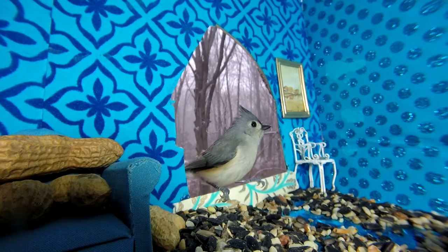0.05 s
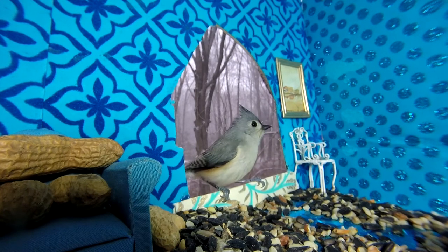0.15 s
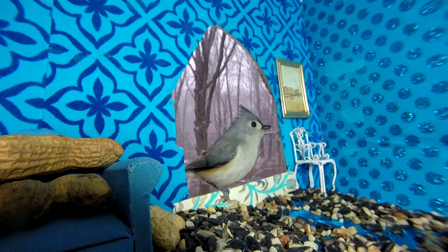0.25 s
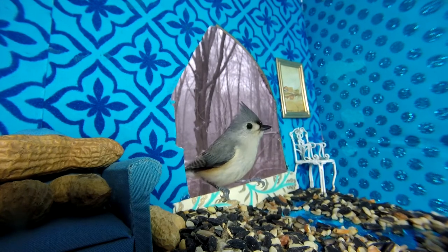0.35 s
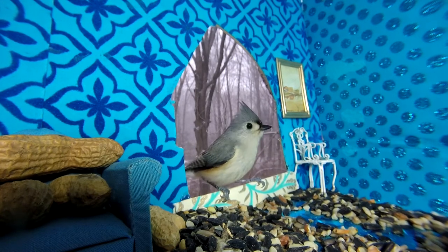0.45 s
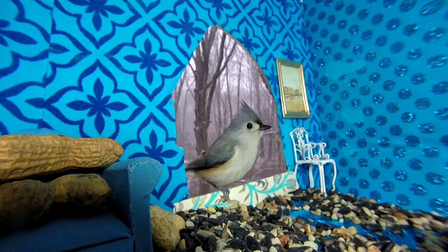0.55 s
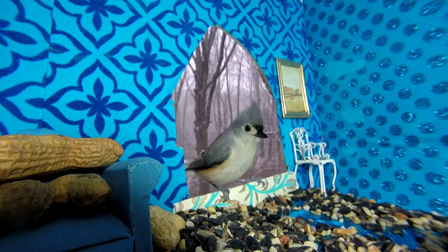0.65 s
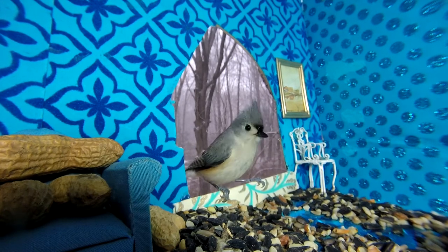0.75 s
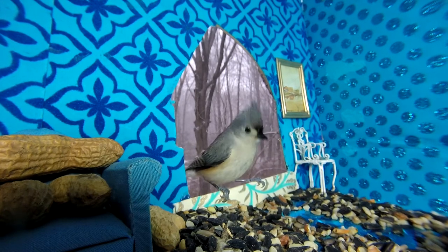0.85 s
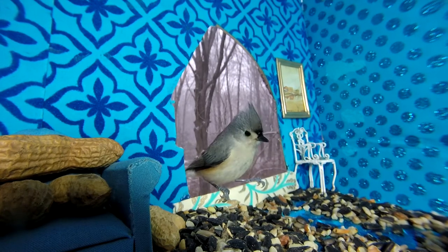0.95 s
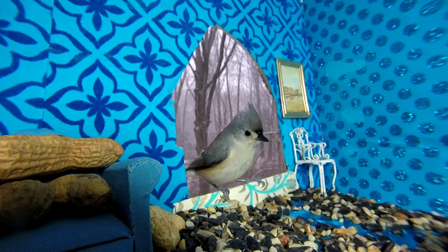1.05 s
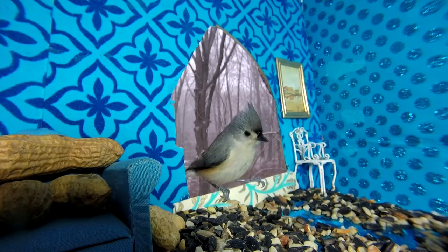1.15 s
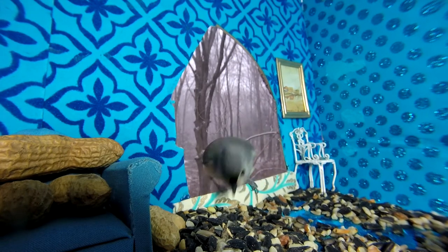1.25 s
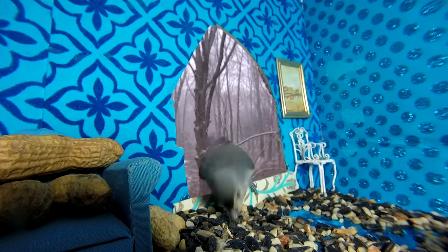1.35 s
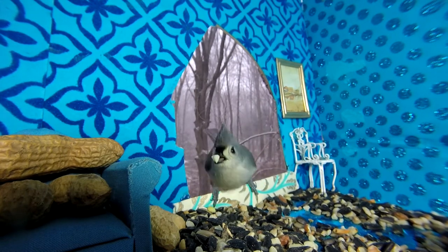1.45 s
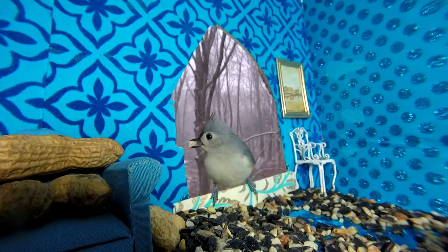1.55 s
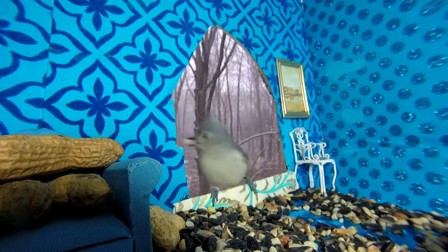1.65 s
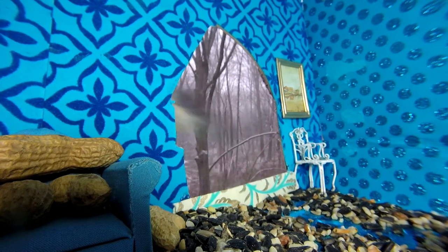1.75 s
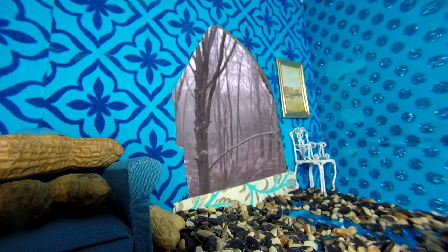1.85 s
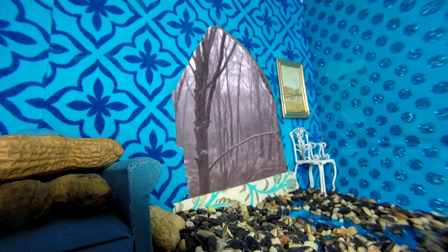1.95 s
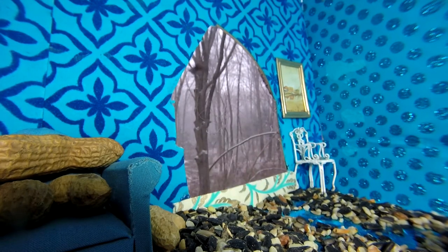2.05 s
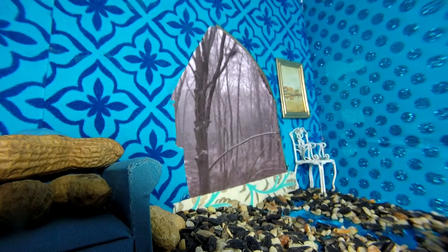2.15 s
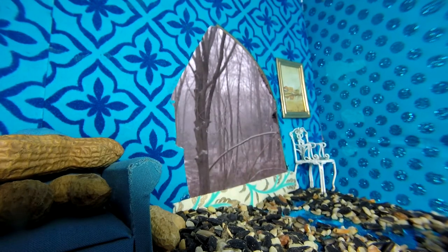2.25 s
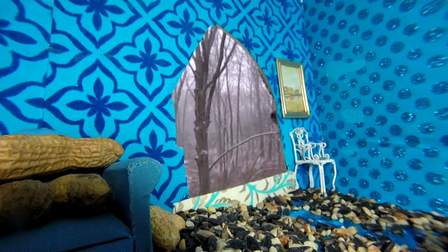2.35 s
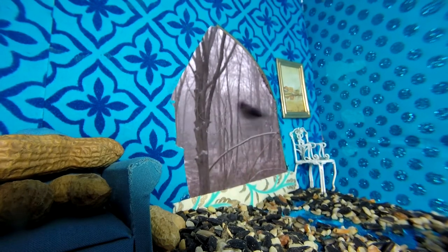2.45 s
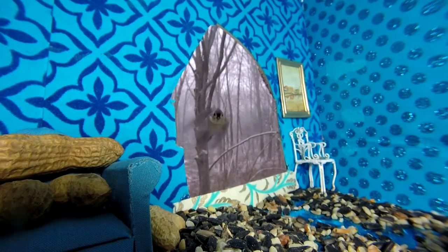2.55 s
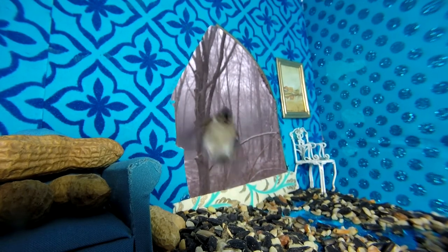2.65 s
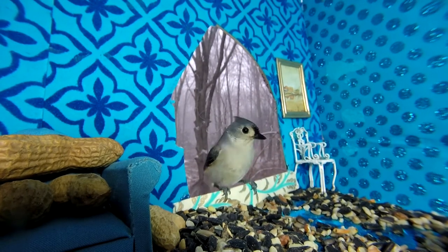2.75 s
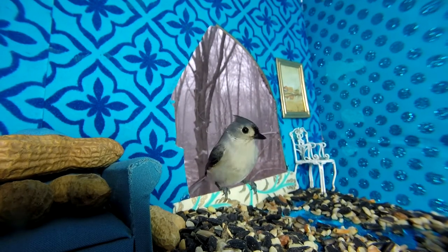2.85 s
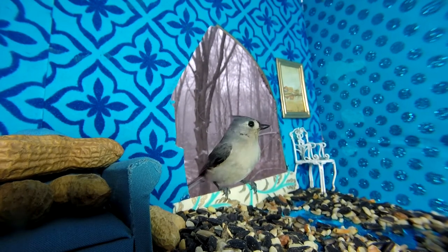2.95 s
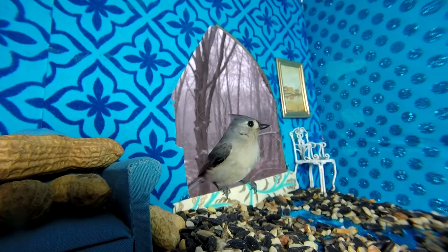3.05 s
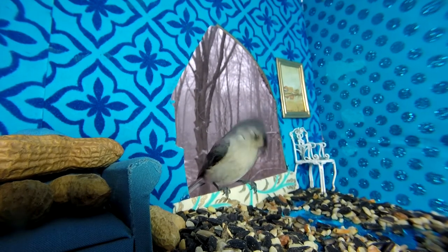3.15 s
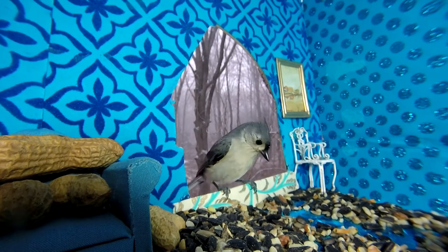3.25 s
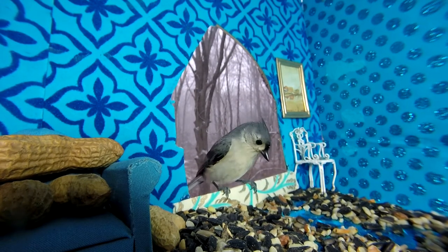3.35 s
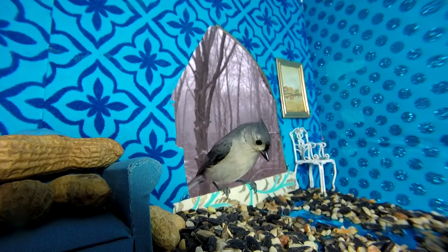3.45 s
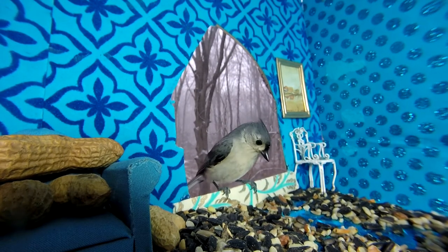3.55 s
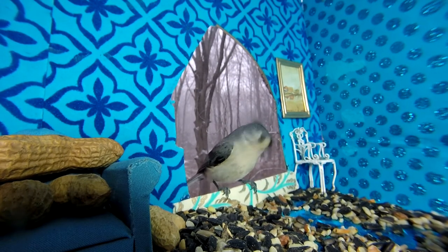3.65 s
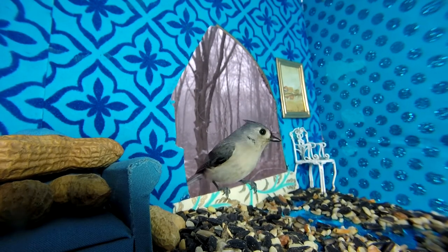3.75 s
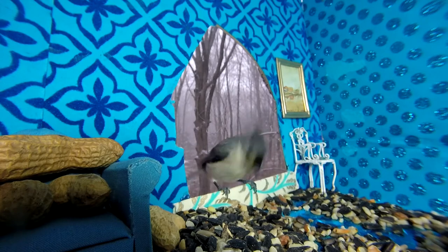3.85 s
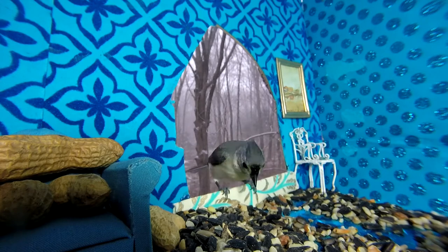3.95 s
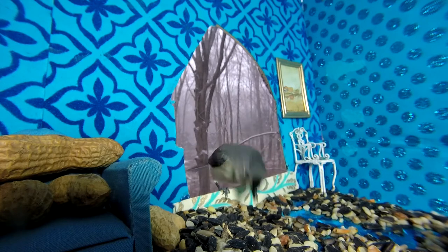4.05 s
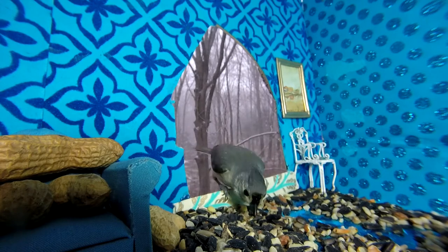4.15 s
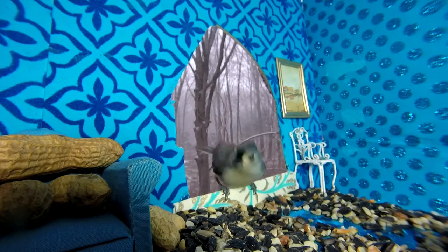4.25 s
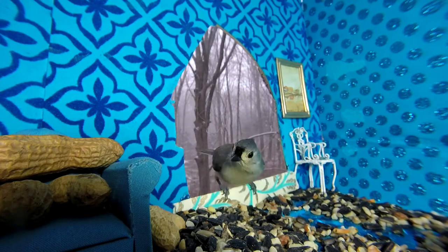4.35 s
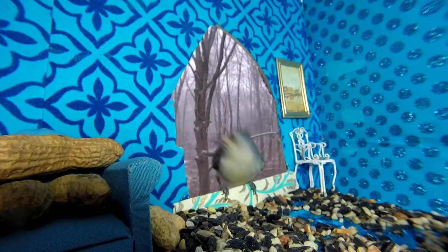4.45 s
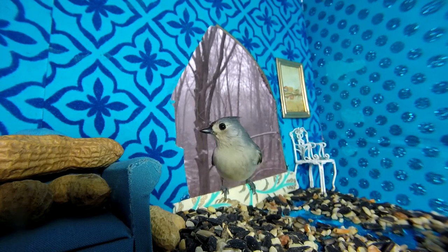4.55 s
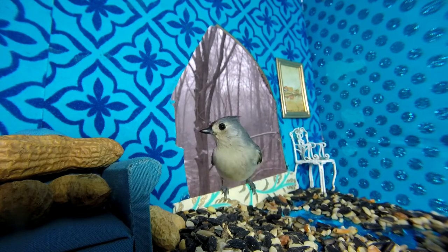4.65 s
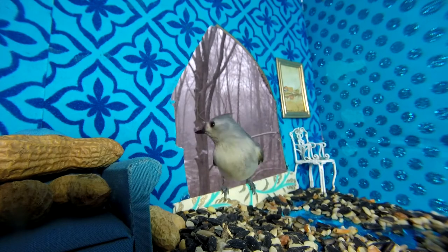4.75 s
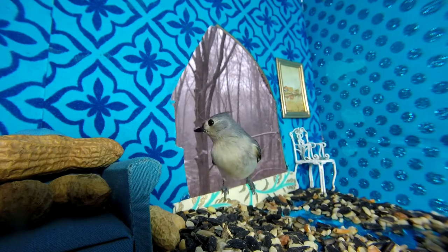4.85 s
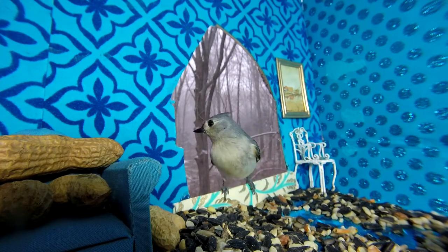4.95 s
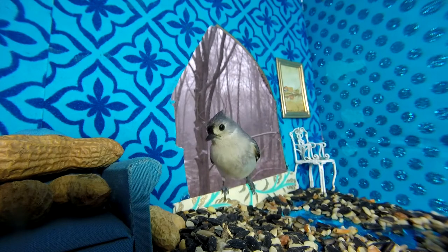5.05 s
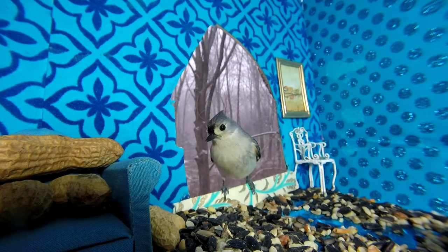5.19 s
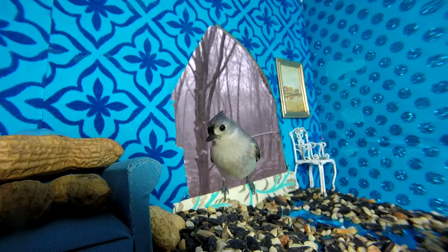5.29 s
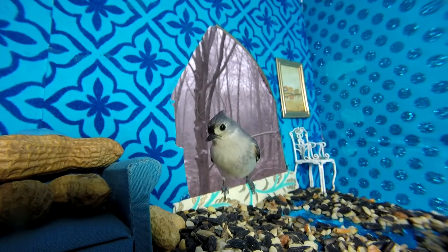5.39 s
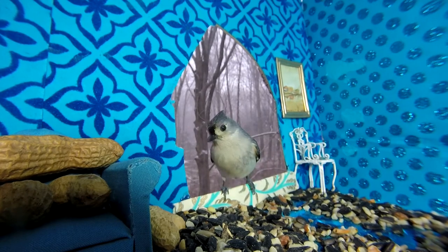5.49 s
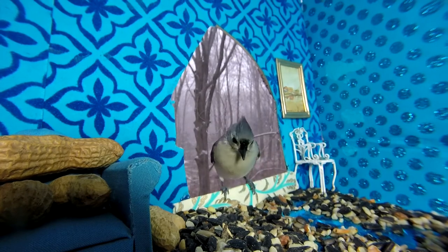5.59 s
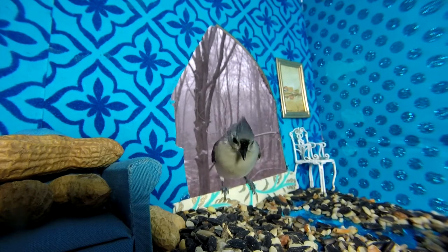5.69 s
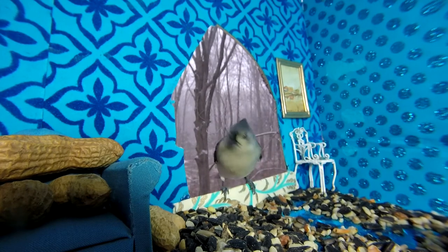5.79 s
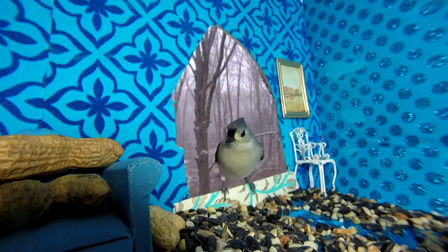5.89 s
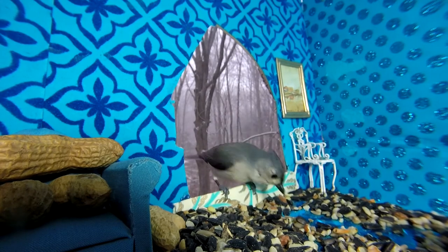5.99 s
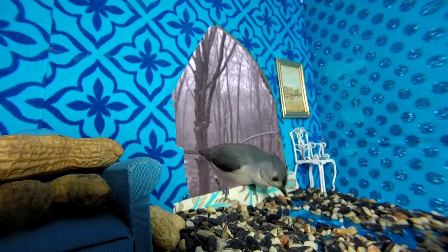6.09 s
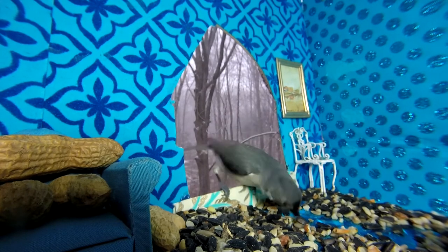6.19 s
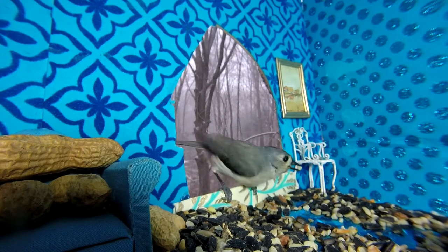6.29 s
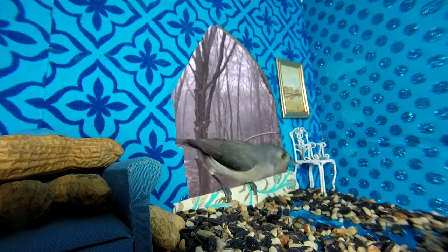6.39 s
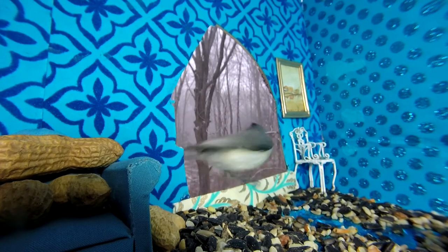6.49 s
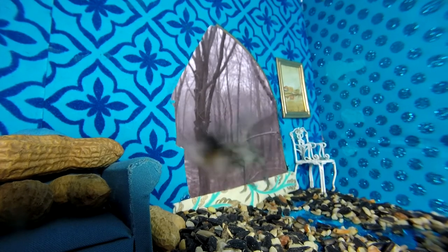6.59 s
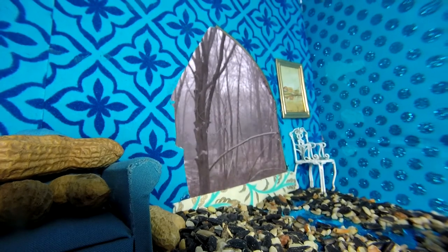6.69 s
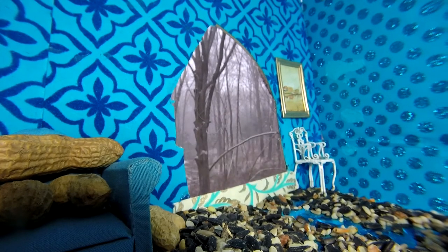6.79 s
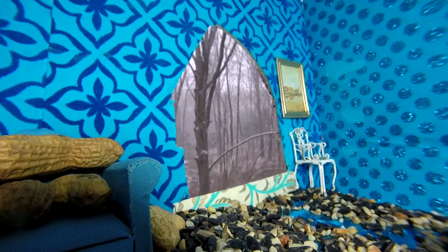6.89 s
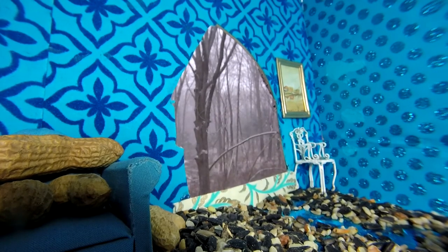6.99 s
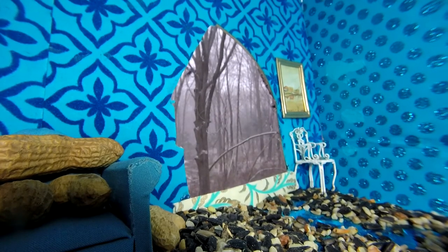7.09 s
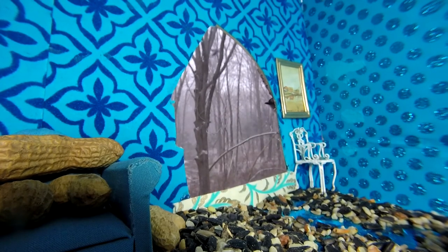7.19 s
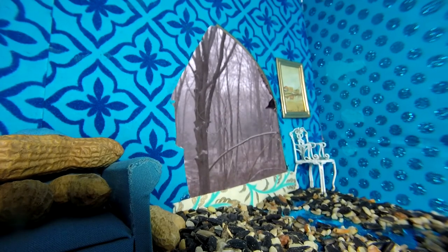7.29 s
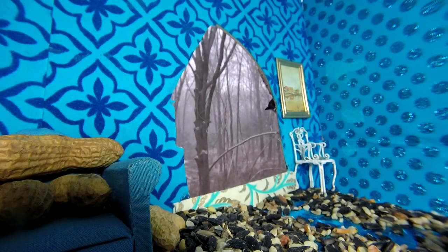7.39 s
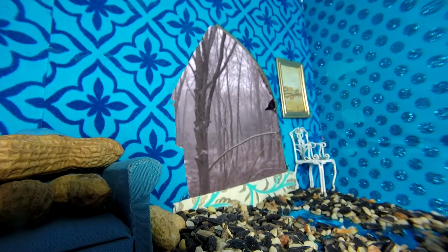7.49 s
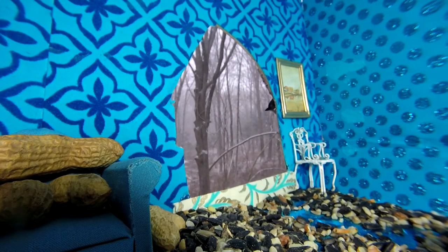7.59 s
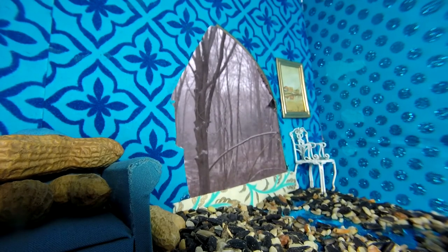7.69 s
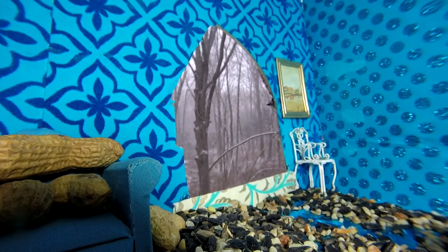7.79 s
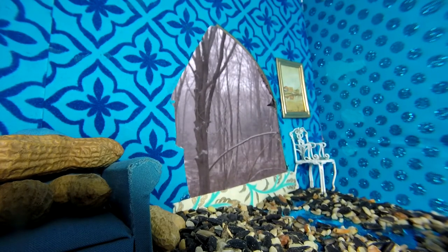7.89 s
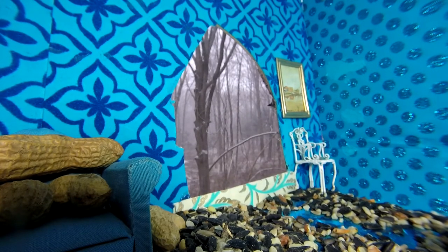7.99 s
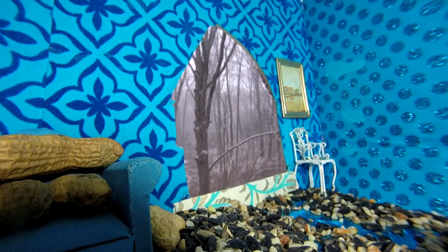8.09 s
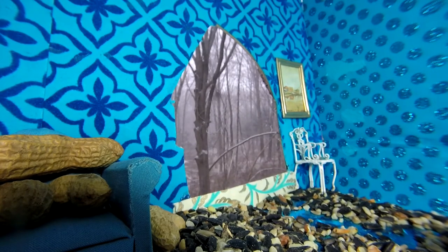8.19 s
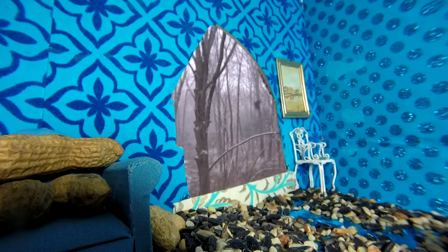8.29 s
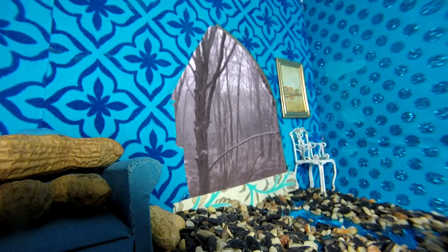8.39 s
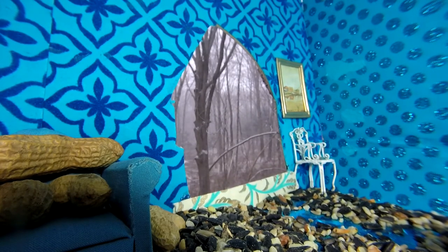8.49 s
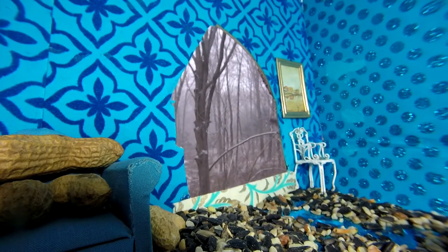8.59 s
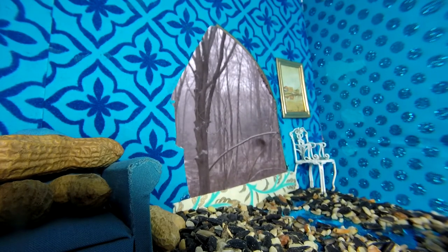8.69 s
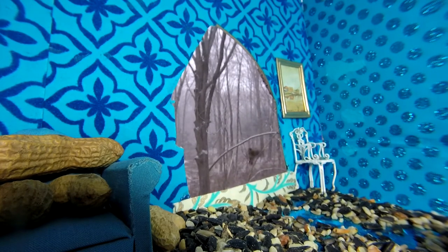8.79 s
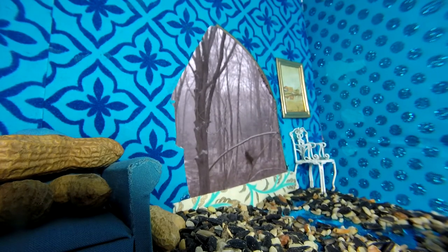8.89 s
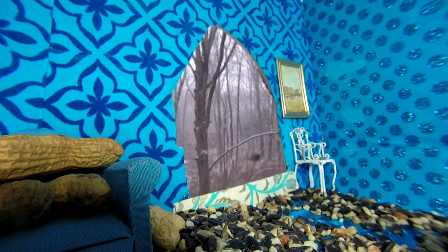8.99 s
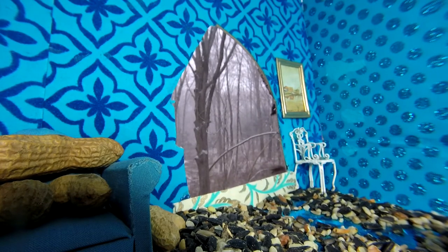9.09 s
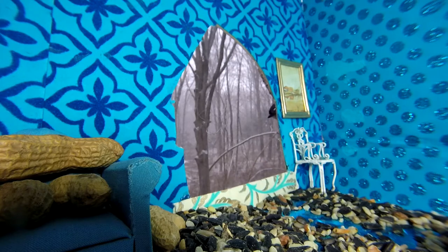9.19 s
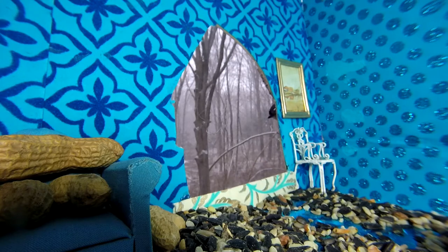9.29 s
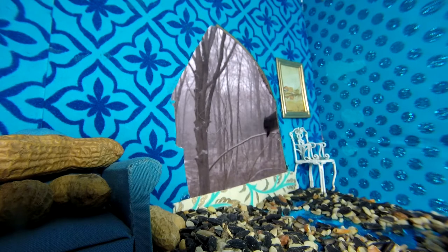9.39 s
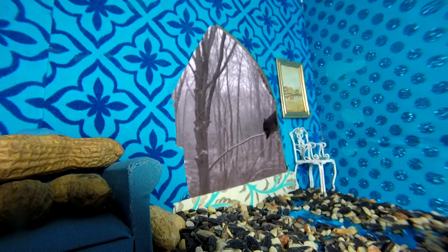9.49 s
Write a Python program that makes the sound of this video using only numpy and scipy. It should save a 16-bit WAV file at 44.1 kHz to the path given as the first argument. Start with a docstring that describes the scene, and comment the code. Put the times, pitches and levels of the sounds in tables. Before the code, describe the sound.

A soft outdoor rumble and a low, steady-pitched but wavering distant motor hum continue throughout, the hum swelling and fading. The first second is nearly quiet, with faint hollow taps. At 1.2-1.7 s small claws scrabble and knock sharply on resonant wood, then about nine rapid low wing snaps with puffs of air fade by 2.2 s. Light knocks precede a fluttering return around 2.5 s and a strong woody landing at 2.7 s. Tiny clicks and sparse touches follow through 5 s; firmer pecks come near 5.3 s. Knocks at 6.2 s lead to dense scratching and a loud take-off flutter at 6.5-7 s. Small taps continue near 7.1 and 8.25 s, then a weak flutter and light knocks at 9.1-9.3 s. Thin, distant gliding whistles echo briefly near 2.5, 5.6 and 8.7 s. The microphone sits inside the hollow box, very close.

```python
"""A wavering hum and outdoor rumble come first; then a small bird hops, scrabbles and pecks on a wooden feeder box.
It flies off and comes back, heard by a microphone inside the hollow box.
Feet, claws and beak are short rough bursts of noise and fading tones, the box's own notes.
Wing beats are short low snaps and slow puffs of air, with gusts of filtered noise around them.
A far bird's thin gliding whistles echo behind; the hum is a slowly wandering tone, the rumble shaped noise."""
import sys
import numpy as np
from scipy import signal
from scipy.fft import rfft, irfft
from scipy.io import wavfile
from scipy.ndimage import uniform_filter1d

SR = 44100
rng = np.random.default_rng(int(sys.argv[2]) if len(sys.argv) > 2 else 0)


def bounce(signal):
    """Save signal as a 16-bit WAV file at the path given by the first command-line argument."""
    frames = np.transpose(np.atleast_2d(signal))
    limited = np.clip(frames, -1, 1)
    pcm = np.round(limited * 32767).astype(np.int16)
    wavfile.write(sys.argv[1], SR, pcm)


N = 420713
T = np.arange(N) / SR  # time of each sample [s]

# colour of the outdoor air noise: (frequency [Hz], relative level per Hz [dB])
AIR_COLOUR = [(15, -28), (22, -2), (70, 3.5), (170, -5), (277, -7), (642, -13), (738, -18), (1190, -26),
              (1610, -26.5), (8650, -40), (9950, -40.5), (14300, -52.5), (16000, -56)]
# loudness of the hum over time: (time [s], level [dB])
HUM_LEVELS = [(0, -42.5), (.6, -44.5), (1.1, -53.5), (2.2, -50), (2.6, -49), (3.5, -46), (4.4, -49),
              (4.8, -52), (5.3, -46), (5.7, -53.5), (6.1, -47.5), (6.9, -58), (7.5, -46), (7.85, -50.5),
              (8.3, -44.5), (8.8, -56.5), (9.54, -54)]
# overtones of the hum: (multiple of the lowest tone, level against the lowest tone [dB])
HUM_OVERTONES = [(2, -24), (3, -25.5)]
# far bird's whistles: (time [s], length [s], start pitch [Hz], end pitch [Hz], whistle level [dB], echo peak [dB])
FAR_CALLS = [(2.49, .024, 8200, 7350, -59, -68), (5.525, 0.034, 7450, 8300, -75, -65),
             (5.69, 0.052, 7030, 8100, -57, -61), (8.715, .045, 7300, 8100, -60, -62)]
# air thrown into the box: (time [s], length [ms], low air level [dB], breathy feather hiss level [dB])
GUSTS = [(1.739, 180, -39, -62.5), (2.46, 340, -42, -63), (6.55, 126, -31, -52), (6.66, 210, -42, -66)]
# runs of wing beats: (first beat [s], number of beats, period [ms], snap peak [dB], snap change per beat [dB],
# snap pitch [Hz], puff peak [dB], puff change per beat [dB], puff start after the snap [ms], puff length [ms],
# first swing of pressure [+1 or -1])
FLIGHTS = [(1.751, 1, 48, -28, 0, 200, -24, 0, 1.5, 30, -1),
           (1.787, 8, 48.4, -22, -1, 210, -22, -3, 6.5, 25, -1),
           (2.508, 2, 45, -28.5, 7, 188, -32, -4, -16, 39, 1),
           (2.574, 1, 45, -40, 0, 200, -34, 0, 3, 36, 1), (6.574, 1, 48, -19, 0, 182, -28, 0, -36, 39, 1),
           (6.601, 1, 48, -19.5, 0, 216, -22, 0, -4, 32, -1),
           (6.639, 1, 48, -19.5, 0, 171, -23, 0, 8, 30, -1),
           (6.688, 2, 49, -26.5, -10, 170, -35, -14, 7, 19, 1),
           (6.784, 5, 48, -28, -1, 183, -32, -1.5, 4.5, 21.5, 1),
           (9.069, 4, 47.3, -31.5, -3, 203, -45, 2.5, 12, 17, -1)]
# claws dragging and seeds shifting: (time [s], length [ms], rasp level [dB], boom level [dB], treble level [dB])
SCRAPES = [(1.194, 19, -51, -50, -66), (1.22, 7.6, -56, -44, -66), (1.236, 33, -40.5, -42, -47.5),
           (1.268, 16.5, -39, -58, -50), (1.292, 25, -55, -43, -63), (1.32, 23, -46, -45, -50),
           (1.343, 44, -55, -39, -64), (1.378, 8.6, -33.5, -26, -35.5), (1.401, 28, -51, -45, -64),
           (1.505, 13, -51, -54, -57), (1.519, 46, -49.5, -46.5, -56.5), (1.571, 16, -51, -44.5, -70),
           (1.627, 14, -57, -54, -68), (1.648, 34, -57, -56, -64), (1.69, 36, -45.5, -41, -66),
           (2.474, 120, -63.5, -58, -67), (2.65, 35, -59, -47, -66), (2.682, 21, -36, -42, -42),
           (2.707, 19, -44, -43, -56), (2.727, 24, -51.5, -47, -62), (2.757, 97, -62.5, -51.5, -71),
           (4.09, 56, -59, -43.5, -73), (5.185, 22, -59, -53, -62), (5.326, 130, -67, -47.5, -70),
           (5.47, 480, -78, -51, -80), (6.191, 21, -62, -36, -70), (6.222, 52, -65, -47, -72),
           (6.439, 16, -55, -47, -67), (6.454, 15, -47, -45, -54), (6.468, 36, -43.5, -46, -48),
           (6.525, 21, -46, -36, -56), (6.542, 32, -42, -36, -46.5), (6.571, 25, -37.5, -40, -45),
           (6.6, 21, -49, -30, -58), (6.625, 66, -69, -57, -73), (9.084, 55, -74, -53, -80),
           (9.205, 72, -68, -58, -80), (9.271, 74, -69, -48, -75)]
# claws and seed husks clicking: (time [s], peak [dB], centre pitch [Hz])
TICKS = [(1.194, -52, 3000), (1.305, -37, 3200), (1.321, -46, 6000), (1.328, -32, 6040), (1.368, -34, 3520),
         (1.506, -49, 4500), (1.711, -41, 4800), (1.746, -35, 1790), (2.403, -41, 6940), (2.558, -47, 8000),
         (2.568, -49, 11000), (2.655, -50, 8100), (2.784, -54, 5200), (2.8396, -44.5, 2470),
         (2.903, -46, 2410), (2.9712, -45, 2960), (4.013, -46.5, 1600), (4.078, -49, 2300),
         (4.089, -54, 2300), (4.131, -53, 2600), (4.2476, -48, 2600), (4.256, -51, 5500),
         (4.869, -39, 8600), (4.917, -51, 7540), (5.033, -48.5, 6100), (5.196, -53, 8000),
         (5.296, -50, 5000), (5.715, -44, 7900), (5.952, -45, 3360), (6.156, -50, 1610), (6.162, -54, 2500),
         (6.233, -49, 3000), (6.246, -43, 1790), (6.4414, -43, 3370), (6.49, -32, 4020),
         (6.5423, -32, 6500), (6.548, -32, 6560), (6.643, -47, 3100), (6.874, -42, 7500),
         (7.0125, -40.5, 3400), (7.022, -44, 3400), (7.1735, -43, 2640), (8.238, -42, 2930),
         (9.33, -47.5, 4500)]
# feet and beak on wood: (time [s], body peak [dB], favoured body pitch [Hz], panel peak [dB],
# favoured panel pitch [Hz], claw peak [dB], ring time [ms])
KNOCKS = [(0.223, -37, 390, -65, 845, -65, 130), (1.026, -35, 400, -51, 931, -65, 39),
          (1.222, -27.5, 337, -42, 1560, -45, 43), (1.234, -34, 400, -48, 900, -26.5, 15),
          (1.27, -17.5, 570, -29.5, 740, -30.5, 12.4), (1.345, -17.5, 340, -38, 929, -40, 44),
          (1.379, -30, 550, -28.5, 1530, -21, 19), (1.52, -30, 436, -38.5, 1530, -44, 22),
          (1.54, -33, 375, -41, 1560, -43, 17), (1.549, -34, 375, -37, 1600, -45, 10),
          (1.571, -37.5, 350, -36.5, 1620, -40.5, 57), (1.691, -39, 340, -44, 915, -32, 16),
          (2.112, -41, 245, -49, 930, -57.5, 160), (2.249, -26, 400, -47, 861, -48, 28),
          (2.35, -36, 444, -44.5, 990, -68, 34), (2.382, -30.5, 269, -62, 937, -54, 8.6),
          (2.499, -37, 276, -46, 915, -50, 29), (2.522, -42, 383, -44, 960, -58, 15),
          (2.526, -28.5, 390, -53, 756, -62, 72), (2.537, -33, 395, -55, 805, -56, 110),
          (2.658, -29.5, 383, -43, 900, -62, 38), (2.681, -25, 281, -23, 751, -35, 15),
          (2.685, -10, 377, -32, 1650, -22.5, 15.4), (2.692, -25, 508, -19, 1970, -16, 8.8),
          (2.703, -23, 380, -41, 888, -42, 27), (2.711, -27, 300, -42, 1620, -48, 16),
          (2.736, -31.5, 380, -46, 1700, -52, 22), (2.778, -44, 400, -50, 1620, -60, 20),
          (2.82, -38, 540, -45, 985, -50, 22), (3.121, -37, 405, -50, 740, -52, 12),
          (3.969, -43, 410, -55, 883, -58, 57), (4.098, -51, 400, -43, 1610, -45, 13),
          (4.112, -40, 328, -41, 1610, -38.5, 8.8), (4.479, -45, 511, -48, 966, -59, 20),
          (5.179, -41.5, 377, -51, 869, -57, 36), (5.32, -20, 447, -39, 1600, -52, 47),
          (5.329, -24, 286, -33.5, 940, -50, 20), (5.369, -31, 460, -28.5, 940, -66, 22),
          (5.475, -45, 250, -42, 940, -67, 14), (5.478, -52, 400, -53, 1620, -69, 13),
          (5.508, -53, 250, -49, 930, -68, 31), (5.562, -34, 268, -39.5, 1610, -62, 18),
          (5.853, -44, 480, -46, 1080, -55, 11), (5.982, -42, 480, -44.5, 990, -58, 9.3),
          (6.187, -20.5, 330, -34, 885, -38, 9.5), (6.191, -16.5, 516, -28.5, 1220, -38, 8.5),
          (6.205, -29.5, 260, -40, 1600, -44, 16), (6.224, -45, 339, -45, 1620, -44, 13),
          (6.274, -36, 248, -47, 1620, -51, 16), (6.454, -34.5, 557, -53, 762, -51, 20),
          (6.469, -32, 615, -39, 1740, -47, 110), (6.525, -21, 370, -36, 837, -35, 9.4),
          (6.533, -17, 387, -37, 1630, -32, 13), (6.558, -36.5, 258, -38, 915, -36, 21),
          (6.567, -24, 305, -35, 918, -34, 19), (6.574, -16.5, 370, -34, 1620, -30, 21),
          (6.603, -18, 375, -30.5, 1060, -39, 19.6), (6.837, -43, 450, -50, 1620, -66, 28),
          (6.961, -54, 443, -56.5, 1610, -68, 27), (7.07, -37.5, 460, -57, 856, -57, 50),
          (7.104, -32.5, 453, -46.5, 953, -58, 120), (7.155, -30.5, 420, -54, 1610, -65, 27),
          (8.255, -38, 344, -41.5, 1610, -65, 39), (8.261, -31.5, 242, -45, 900, -67, 9.8),
          (9.095, -33, 426, -47, 1050, -65, 12), (9.105, -38, 400, -50, 1620, -65, 19),
          (9.113, -41, 400, -55, 930, -65, 26), (9.212, -38, 278, -64, 1130, -56, 40),
          (9.274, -36, 450, -42, 900, -50.5, 24), (9.281, -35.5, 424, -50, 1640, -52, 46),
          (9.326, -36.5, 400, -56, 1600, -62, 13)]
# the notes (modes) of the ringing box: (pitch [Hz], relative level [dB], time to fade by 60 dB [s])
BOX_MODES = [(130.4, 1, 0.25), (156.4, 14.5, 0.083), (260.4, -0.5, 0.12), (343.4, 2.5, 0.067),
             (391.8, -0.5, 0.3), (441, 3, 0.084), (541, 0.5, 0.053), (623, 1.5, 0.035), (726, -1.5, 0.012),
             (924, 0.5, 0.043), (936, -0.5, 0.15), (1090, -9, 0.079), (1590, -21, 0.026), (1630, 10, 0.056),
             (1827, 0.5, 0.038), (2070, -17, 0.051), (2460, -5, 0.026), (2687, 4.5, 0.031),
             (3100, 11.5, 0.015), (3235, 1, 0.025), (3900, -28, 0.018), (5220, 17.5, 0.0054),
             (5110, 3, 0.029), (6400, 9.5, 0.0038), (7700, -8, 0.0077), (9000, 10, 0.0038)]

AIR_DB = -47  # average (rms) level
HUM_HZ = 221.3
GUST_TOP_HZ, WASH_TOP_HZ = 125, 4500
BEAT_SCATTER_DB = 1.8  # chance spread of each beat's loudness
RASP_TOP_HZ, TREBLE_TOP_HZ = 5160, 9870
RASP_RING = 0.45  # share of the box's ring in the rasp
CATCH, CATCH_DB = SR // 250, 3  # claws catch and let go: samples per catch, spread
FAINT_TICKS = 7  # seeds settling at chance moments
FAINT_TICK_DB, FAINT_TICK_HZ = -57, 3080  # lowest level and lowest centre pitch of these
TICK_HISS_DB = -2  # hiss peak against the tick's ring
TICK_RING_S = 0.005
PANEL_HZ, CLAW_HZ, SHEEN_HZ = (720, 2050), (2200, 3600), (4300, 12000)  # ranges of box modes
THUD_DB, SHEEN_DB = -12, -8  # low thud against the body; brightest modes against the claw crack
SHEEN_PER_DB, SHEEN_FULL_DB = 0.25, -35  # claw cracks softer than this lose sheen faster
CONTACT_MS, CONTACT_PER_RING = 0.93, 0.028  # shortest touch; longer-ringing landings touch longer
FAVOUR_DB, FAVOUR_REACH = -41.5, 0.37  # dB per unit of log pitch away from the spot, up to this far
PITCH_WANDER, UPPER_WANDER = 0.018, 0.05  # pitch scatter of all modes; extra above the panels
TOP_HZ = 15400  # the recorder's upper limit


def undb(db):
    """Turn decibels into a gain."""
    return 10 ** (np.asarray(db) / 20)


def add(out, s, x):
    """Mix x into out from time s."""
    i = int(s * SR)
    out[i:i + len(x)] += x[:len(out) - i]


def peak(x, db):
    """Scale x so that its highest point has this level."""
    return x * undb(db) / np.abs(x).max()


def band(x, lo_hz, hi_hz):
    """Keep mostly the pitches between two limits."""
    return signal.sosfilt(signal.butter(2, [lo_hz, hi_hz], "bandpass", fs=SR, output="sos"), x)


def walk(rate):
    """Slow random wander around zero, with a spread near 1."""
    k = int(SR / rate)
    steps = np.repeat(rng.standard_normal(N // k + 1), k)
    return 0.683 * uniform_filter1d(uniform_filter1d(steps, k), k)[:N]


def ring(lo_hz, hi_hz, spot_hz=0, damp_s=0.92):
    """One blow's ring from the box modes in a range; each spot favours modes near its pitch, a resting foot damps them."""
    t = np.arange(SR // 8) / SR
    luck = rng.standard_normal((len(BOX_MODES), 2))
    out = 0
    for (hz, db, t60), (level_luck, pitch_luck) in zip(BOX_MODES, luck):
        if lo_hz <= hz < hi_hz:
            off_db = FAVOUR_DB * min(abs(np.log(hz / spot_hz)), FAVOUR_REACH) if spot_hz else 0
            gain = undb(db + off_db + 2.5 * level_luck)
            wander = PITCH_WANDER + UPPER_WANDER * (hz > CLAW_HZ[0])
            mode_hz = hz * (1 + wander * pitch_luck)
            fade = np.exp(-np.log(1000) * t / t60)
            out = out + gain * fade * np.sin(2 * np.pi * mode_hz * t)
    damping = 1.77 * np.exp(-(t / damp_s) ** 2) + 0.26 * np.exp(-t / damp_s)
    return out * damping


def air():
    """Outdoor rumble and hiss: shaped noise whose lows gust gently while the treble stays smoother."""
    f = np.fft.rfftfreq(N, 1 / SR) + 1  # the added 1 Hz avoids log of zero
    hz, db = np.transpose(AIR_COLOUR)
    colour = undb(np.interp(np.log(f), np.log(hz), db))
    spectrum = rfft(rng.standard_normal(N)) * colour
    low_share = 1 / (1 + (f / 500) ** 2)
    low = irfft(spectrum * low_share, N)
    high = irfft(spectrum * (1 - low_share), N)
    out = low * undb(1.2 * walk(1.5)) + high * undb(0.6 * walk(4))
    return out * undb(AIR_DB) / out.std()


def hum():
    """A distant motor tone that wavers a little, swells and fades, with faint overtones."""
    phase = 2 * np.pi * np.cumsum(HUM_HZ + 0.96 * walk(2.43)) / SR
    tone = np.sin(phase)
    for multiple, db in HUM_OVERTONES:
        tone = tone + undb(db + 2 * walk(2.3)) * np.sin(multiple * phase)
    level_db = np.interp(T, *zip(*HUM_LEVELS)) + 1.2 * walk(15.0)
    return np.sqrt(2) * undb(level_db) * tone  # sqrt(2) makes it the average (rms) level of the lowest tone


def far_calls():
    """Thin gliding whistles, smeared by echoes from the trees, made of fading noise."""
    out = np.zeros(N)
    t = np.arange(SR // 3) / SR
    for s, length, from_hz, to_hz, db, echo_db in FAR_CALLS:
        u = np.linspace(0, 1, int(length * SR))
        glide_hz = from_hz + (to_hz - from_hz) * u
        whistle = np.sin(np.pi * u) * np.sin(2 * np.pi * np.cumsum(glide_hz) / SR)
        trees = rng.standard_normal(len(t)) * np.exp(-np.log(1000) * t / 0.43)
        add(out, s, undb(db) * whistle)
        add(out, s, peak(signal.fftconvolve(whistle, trees), echo_db))
    return out


def gusts():
    """Turbulent low air, with a feather hiss on it, swells and dies around take-offs and landings."""
    out = np.zeros(N)
    for s, ms, db, wash_db in GUSTS:
        u = np.arange(SR // 2) * 1000 / SR / ms
        swell = np.sin(np.pi * np.minimum(u, 1) ** 0.42)  # rises fast, dies slowly
        low = band(rng.standard_normal(len(u)), 14, GUST_TOP_HZ)
        wash = band(rng.standard_normal(len(u)), 700, WASH_TOP_HZ)
        add(out, s, swell * (undb(db) * low / low.std() + undb(wash_db) * wash / wash.std()))
    return out


def wing_stroke(out, s, snap_db, hz, swing, puff_db, puff_ms, puff_long_ms):
    """One stroke: a snap that booms briefly, a weaker one on the turn, and a slow suck and puff of pushed air."""
    t = np.arange(SR // 14) / SR
    chance = rng.standard_normal(6)
    snap_db = snap_db + BEAT_SCATTER_DB * chance[2]
    puff_db = puff_db + BEAT_SCATTER_DB * chance[3]
    snap_hz = hz * (1 + 0.05 * chance[0])
    turn_hz = 330 * (1 + 0.08 * chance[1])

    sag = t + 0.00015 * (1 - np.exp(-t / 0.00051))  # the snap starts sharp and sags to its pitch
    snap_shape = (1 - np.exp(-(t / 0.0008) ** 2)) * np.exp(-t / 0.0028)
    snap = np.sin(2 * np.pi * snap_hz * sag) * snap_shape
    turn = np.sin(2 * np.pi * turn_hz * t) * (1 - np.exp(-t / 0.0022)) * np.exp(-t / 0.0014)
    u = np.minimum(t * 1000 / (puff_long_ms * (1 + 0.08 * chance[4])), 1)
    puff = -np.sin(2 * np.pi * 1.24 * u) * np.sin(np.pi * u) ** 2
    # eddies off the feathers
    swirl = band(rng.standard_normal(len(t)), 145, 570) * np.sin(np.pi * np.minimum(t / 0.027, 1))

    add(out, s, np.sign(swing) * peak(snap, snap_db))
    add(out, s + 0.013 + 0.00073 * chance[5], np.sign(swing) * peak(turn, snap_db - 14.5))
    add(out, s + puff_ms / 1000, peak(puff, puff_db))
    add(out, s, peak(swirl, snap_db - 17))


def wings():
    """Runs of evenly spaced wing strokes; snaps and puffs may grow or weaken from beat to beat."""
    out = np.zeros(N)
    for first, beats, ms, snap, snap_step, hz, puff, puff_step, lag, long, swing in FLIGHTS:
        for k in range(round(beats)):
            s = first + k * ms / 1000
            wing_stroke(out, s, snap + k * snap_step, hz, swing, puff + k * puff_step, lag, long)
    return out


def scrapes():
    """Stick-slip of claws: dense uneven slips start at once and die away; they rasp and briefly ring the box."""
    out = np.zeros(N)
    for s, ms, rasp_db, boom_db, treble_db in SCRAPES:
        u = np.linspace(0, 1, SR // 6) * 1000 / 6 / ms  # share of the drag; the longest one is cut short
        drag = np.clip(1 - u ** 2, 0, 1) * np.minimum(u / 0.021, 1)
        big_slips = rng.random(len(u)) < 3000 / SR  # about 3000 a second
        slips = drag * rng.standard_normal(len(u)) * (0.35 + big_slips * 2.5)
        catches = np.repeat(rng.standard_normal(len(u) // CATCH + 1), CATCH)[:len(u)]
        slips = slips * undb(CATCH_DB * catches)
        touch = ring(200, SR, damp_s=0.0061)[:SR // 40]  # the foot on the wood keeps the ring short
        rung = undb(-35) * signal.fftconvolve(slips, touch)[:len(u)]
        rasp = band(RASP_RING * rung + slips, 2430, RASP_TOP_HZ) + 0.5 * band(slips, 1530, 2500)
        boom = band(rung + slips, 360, 950)
        treble = band(band(slips, 2200, TREBLE_TOP_HZ), 4250, TREBLE_TOP_HZ)
        for layer, db in ((rasp, rasp_db), (boom, boom_db), (treble, treble_db)):
            loudness = np.sqrt(np.sum(layer ** 2) / np.sum(drag ** 2))
            add(out, s, layer * undb(db) / loudness)
    return out


def ticks():
    """A sharp click: the box's upper modes near its centre ring briefly under a burst of hiss."""
    out = np.zeros(N)
    t = np.arange(SR // 50) / SR
    faint = [(a * T[-SR // 20], FAINT_TICK_DB + 6 * b, FAINT_TICK_HZ + 1400 * c)
             for a, b, c in rng.random((FAINT_TICKS, 3))]
    for s, db, hz in TICKS + faint:
        burst = rng.standard_normal(len(t)) * np.exp(-t / 0.0016)
        hiss = band(burst, 0.5 * hz, min(2.8 * hz, 14000))
        add(out, s, peak(hiss, db + TICK_HISS_DB))
        modes = ring(max(1300, hz / 2), SR, hz, TICK_RING_S)
        strike = burst * np.exp(-t / 0.0005)
        add(out, s, peak(signal.fftconvolve(modes, strike), db))
    return out


def knocks():
    """A foot or beak lands unevenly: a rough contact some ms long drives the body, panels and bright surface modes."""
    out = np.zeros(N)
    t = np.arange(SR // 8) / SR
    for s, body_db, body_hz, panel_db, panel_hz, claw_db, ring_ms in KNOCKS:
        damp = max(ring_ms, 4) / 1000
        contact = CONTACT_MS / 1000 + CONTACT_PER_RING * damp
        # claws touch one after another
        grit = rng.standard_normal(len(t)) * rng.standard_normal(len(t)) * np.exp(-t / contact)
        settle = 1 - np.exp(-(t / contact) ** 2)  # the body builds up while the weight settles
        add(out, s, peak(ring(200, 750, body_hz, damp) * settle, body_db))
        add(out, s, peak(ring(0, 200) * settle, body_db + THUD_DB))
        sheen_db = claw_db + SHEEN_DB + SHEEN_PER_DB * min(claw_db - SHEEN_FULL_DB, 0)
        # last number: how much bare grit joins the ring
        layers = ((*PANEL_HZ, panel_hz, panel_db, 5.0),
                  (*CLAW_HZ, None, claw_db, 10.0),
                  (*SHEEN_HZ, None, sheen_db, 11.0))
        for lo_hz, hi_hz, spot_hz, db, bare in layers:
            rung = signal.fftconvolve(ring(lo_hz, hi_hz, spot_hz, 0.96 * damp), grit)[:len(t)]
            add(out, s, peak(band(rung + bare * grit, 0.8 * lo_hz, 1.15 * hi_hz), db))
    return out


def scene():
    """All sources at one microphone; wood and seeds soak up the highest treble of what touches them."""
    background = air() + hum() + far_calls()
    flight = gusts() + wings()
    touches = scrapes() + ticks() + knocks()
    wood = signal.sosfilt(signal.butter(2, 13000, fs=SR, output="sos"), touches)
    return (background + flight + wood)[None]


def record(dry):
    """The recorder cuts the top with a steep low-pass filter."""
    return signal.sosfilt(signal.ellip(8, 0.2, 60, TOP_HZ, fs=SR, output="sos"), dry)


dry = scene()
out = record(dry)
bounce(out)
```